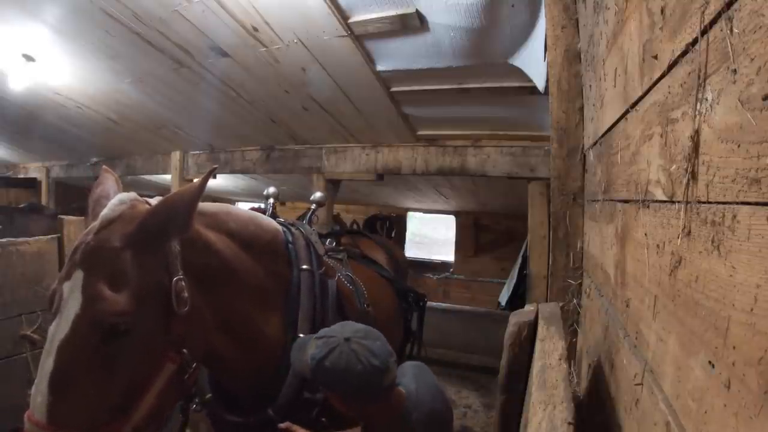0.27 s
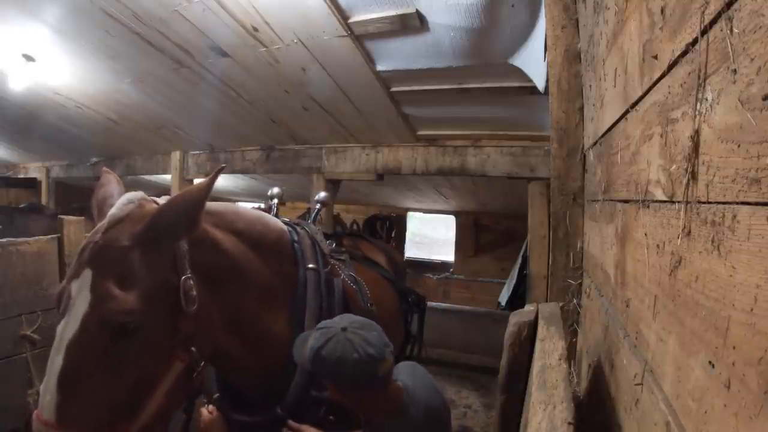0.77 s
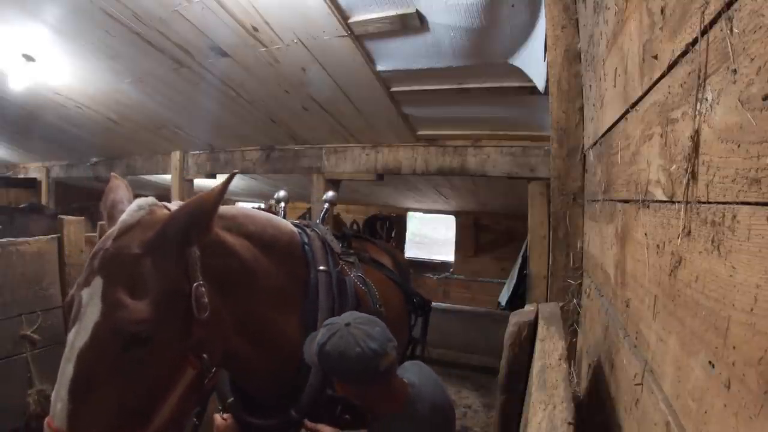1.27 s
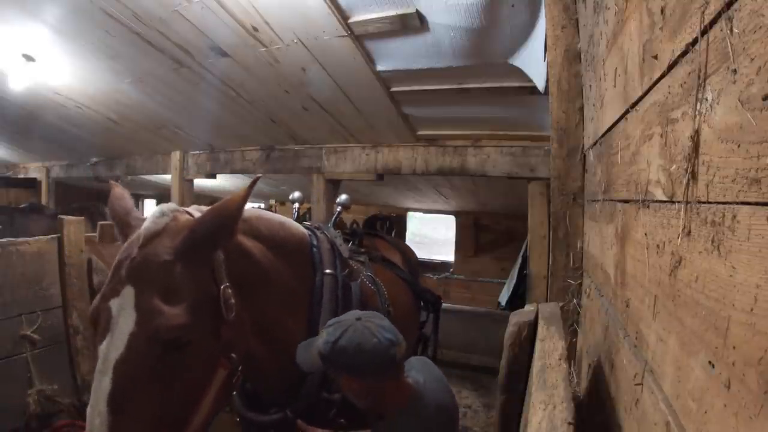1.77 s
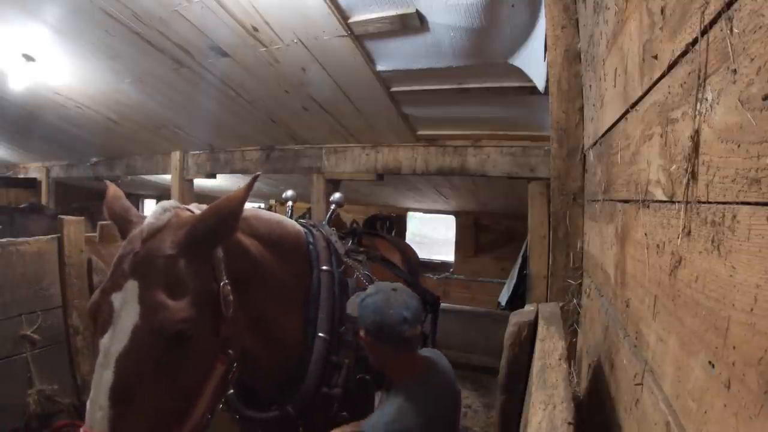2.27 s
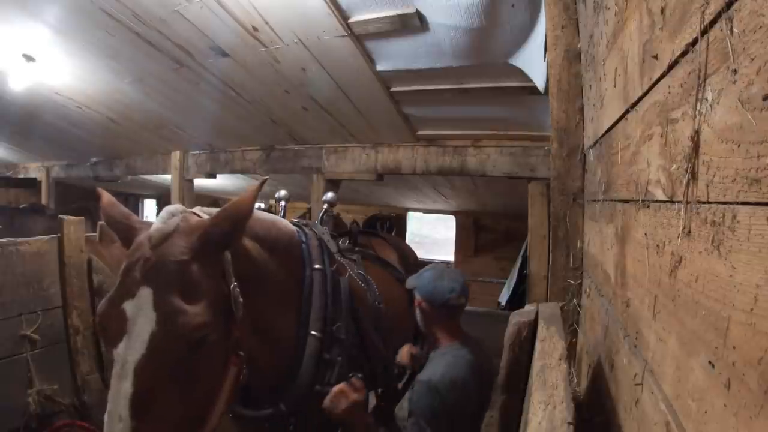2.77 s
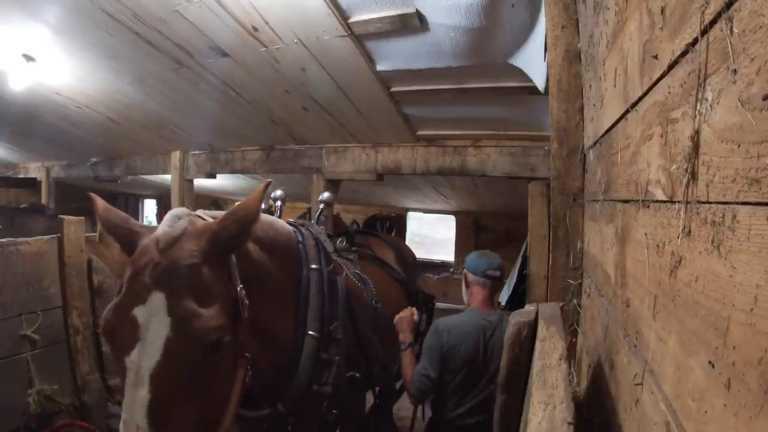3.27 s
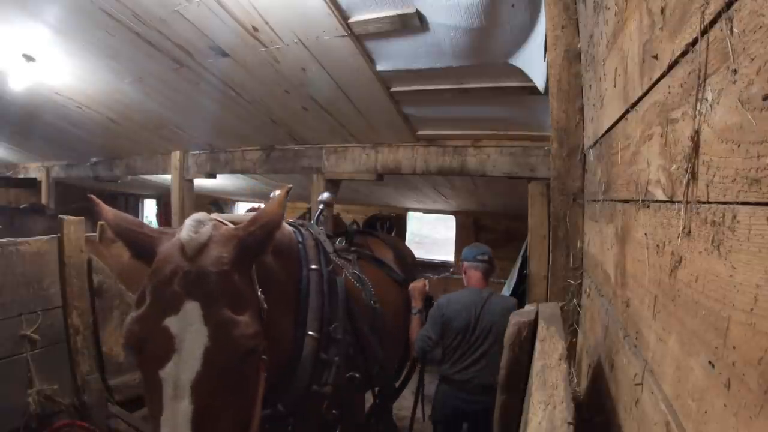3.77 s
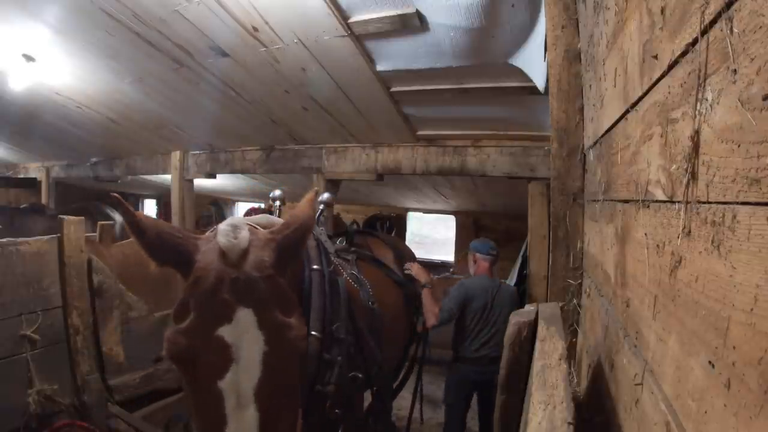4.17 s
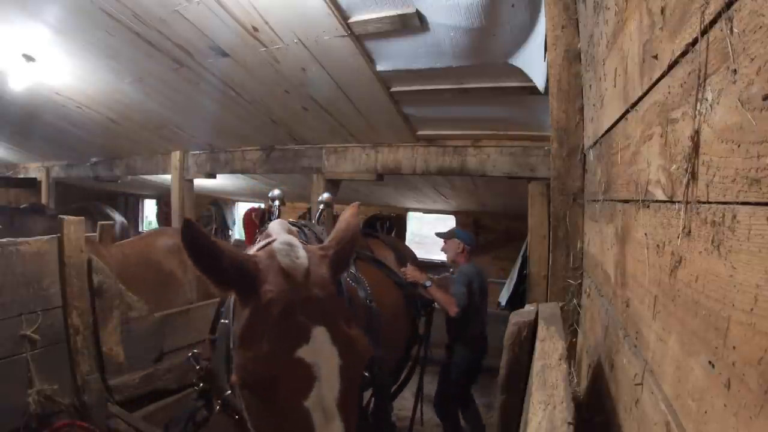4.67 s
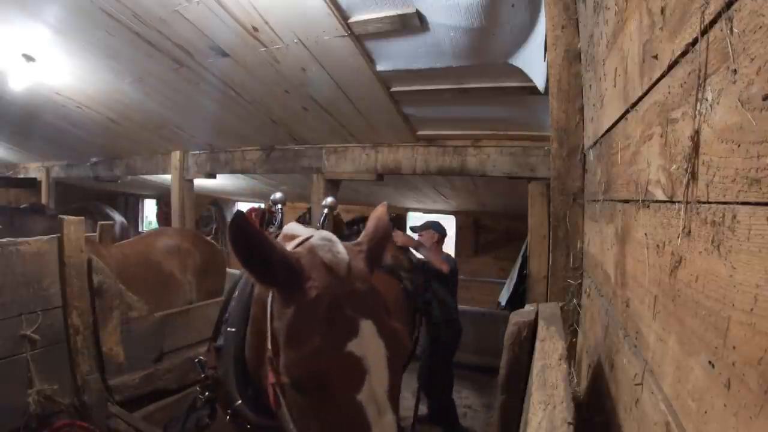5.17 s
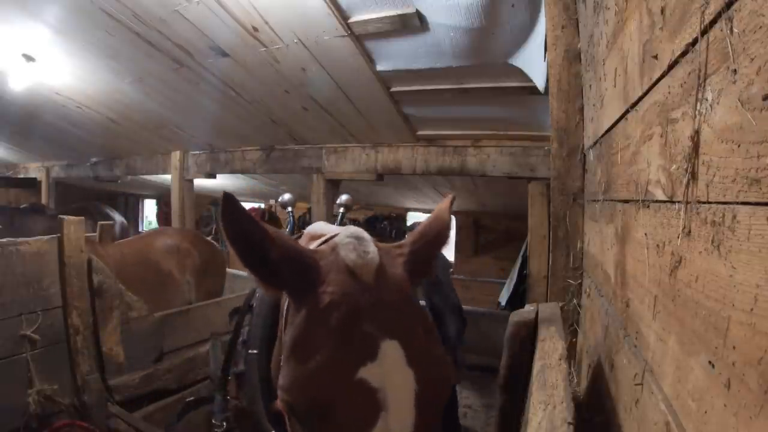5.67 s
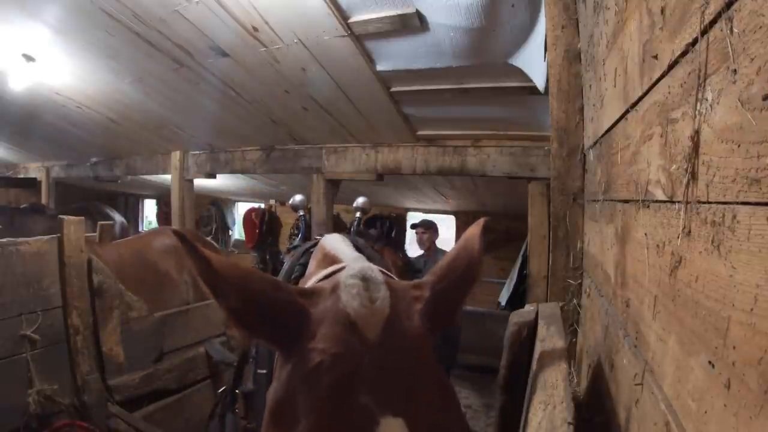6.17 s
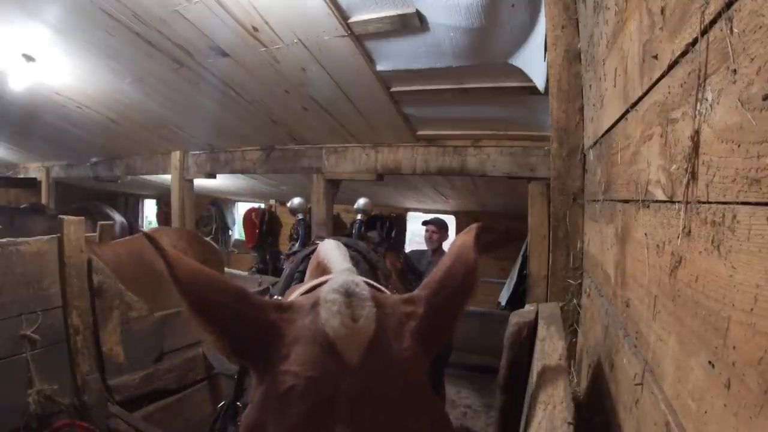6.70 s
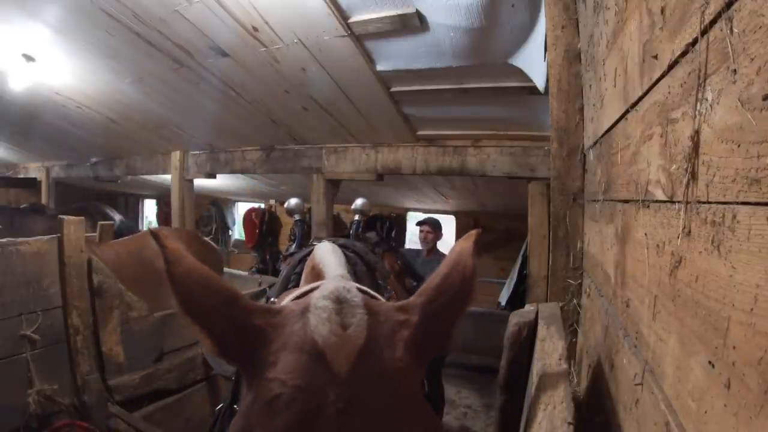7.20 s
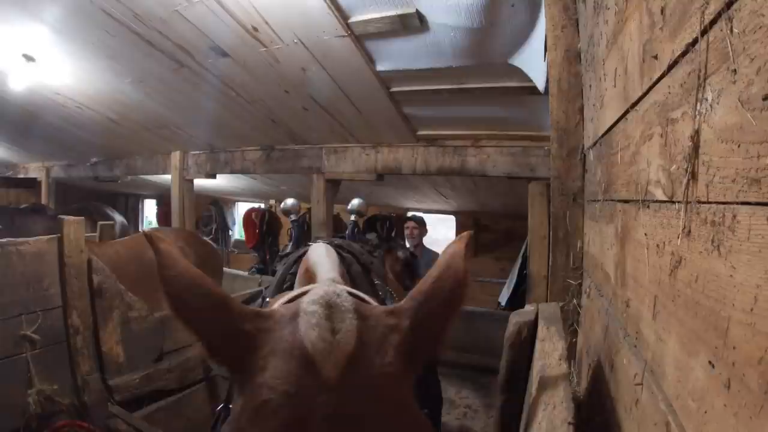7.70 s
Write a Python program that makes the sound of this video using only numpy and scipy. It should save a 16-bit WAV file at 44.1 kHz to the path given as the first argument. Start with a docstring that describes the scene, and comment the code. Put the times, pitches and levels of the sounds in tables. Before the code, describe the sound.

A horse is harnessed in a wooden stall, heard close, with short reflections off the boards. Faint straw and leather rustle and a low barn drone run throughout. A sharp metal snap clicks at about 0.2 seconds, with a lighter one at 0.6. Hollow, heavy thumps of hoof or flank hit the boards around 1.5 and 2.2 seconds, with another sharp snap at 2 and small buckle ticks. From 3 to 4.5 seconds it is quieter, with soft bumps and steps brushing through straw. Knocks build again to a loud wooden thump at about 5.3 seconds and another at 5.7. Chain links, rings and buckles jingle and rattle lightly from there until 6.5 seconds. The rest thins out to faint scrapes and soft bumps, with a few small knocks and a click just before 8 seconds.

```python
"""Harnessing a draft horse in a wooden stall.

Hooves and flanks thump the boards, which ring with the wall and its frame. Snaps and buckles click,
hoof, hame and wood knock, steel rings clink in their own modes. Straw and leather rustle in tiny cracks
over the low drone of the barn. The boards reflect the blows to a small microphone fixed to the wall."""
import sys
import numpy as np
from scipy import signal
from scipy.fft import rfft, irfft
from scipy.io import wavfile
from scipy.ndimage import uniform_filter1d

SR = 44100
rng = np.random.default_rng(int(sys.argv[2]) if len(sys.argv) > 2 else 0)


def generate_wav(signal):
    """Clip the signal to [-1, 1] and save it as 16-bit WAV at the path in sys.argv[1]."""
    frames = np.transpose(np.atleast_2d(signal))
    scaled = np.clip(frames, -1, 1) * 32767
    pcm = np.round(scaled).astype(np.int16)
    wavfile.write(sys.argv[1], SR, pcm)


N = 350154


def undb(db):
    return 10 ** (np.asarray(db) / 20)


def unit(x):
    return x / np.sqrt(np.mean(x ** 2))


def peak(x, db):
    return x * undb(db) / np.max(np.abs(x))


def add(out, start_s, x):
    i = int(start_s * SR)
    out[i:i + len(x)] += x[:N - i]


def colour(x, points):
    """Filter by (Hz, dB) points."""
    hz, db = np.transpose(points)
    bin_hz = np.maximum(np.fft.rfftfreq(len(x), 1 / SR), 1)
    gain = undb(np.interp(np.log(bin_hz), np.log(hz), db))
    return irfft(rfft(x) * gain, len(x))


def band(x, lo_hz, hi_hz):
    sos = signal.butter(2, [lo_hz, min(hi_hz, .45 * SR)], "band", fs=SR, output="sos")
    return signal.sosfilt(sos, x)


def fade(t, t60):
    return np.exp(-np.log(1000) * t / max(t60, .004))


def rise(t, rise_s):
    return 1 - fade(t, rise_s)


def ring(t, modes, spread_db, detune):
    """Damped modes; each blow lands elsewhere and weights them anew."""
    draws = rng.standard_normal((len(modes), 2))
    return sum(undb(db + spread_db * a) * fade(t, t60) * np.sin(2 * np.pi * hz * (1 + detune * b) * t)
               for (hz, db, t60), (a, b) in zip(modes, draws))


def strike(t, modes, tilt_db_per_oct, spread_db):
    """Struck steel; the tilt stands for hardness of touch, which lifts the upper modes."""
    tilted = [(hz, db + tilt_db_per_oct * np.log2(hz / modes[0][0]), t60) for hz, db, t60 in modes]
    return ring(t, tilted, spread_db, detune=.004)


def cracks(events, clank_db, hold_ms):
    """Hard contacts: band noise plus three clank modes. A longer hold also builds more slowly."""
    out, t = np.zeros(N), np.arange(SR // 7) / SR
    hold_s = hold_ms / 1000
    for s, db, hz, t60, octaves in events:
        ratio = 2 ** np.clip(octaves, .2, 2.5)
        noise = band(rng.standard_normal(len(t)), hz / ratio, hz * ratio)
        noise = unit(band(noise, 60, 2 * hz * ratio))
        modes = [(hz, 0, 2.6 * t60), (1.37 * hz, -5, t60), (.89 * hz, -6, t60)]
        clank = undb(clank_db) * ring(t, modes, spread_db=.47, detune=.011)
        envelope = rise(t, 1.6 * hold_s) ** 2 * fade(np.maximum(t - hold_s, 0), t60)
        add(out, s, peak((noise + clank) * envelope, db))
    return out


def flicker(rate_hz, depth_db):
    """Randomly wandering gain."""
    step = int(SR / rate_hz)
    stairs = np.repeat(rng.standard_normal(N // step + 1), step)[:N]
    return undb(depth_db * uniform_filter1d(stairs, step))


def grainy(scatter_db):
    """Noise with scattered stronger grains."""
    return rng.standard_normal(N) * undb(scatter_db * np.minimum(rng.exponential(size=N), 5))


def gain_curves(table):
    times_s, *columns_db = np.transpose(table)
    return [undb(np.interp(np.arange(N) / SR, times_s, db)) for db in columns_db]


def lift(gain, hits, offset_db, t60, rise_s):
    """Add a decaying swell to a gain curve, in power, after each (s, dB) hit."""
    t, power = np.arange(N) / SR, gain ** 2
    for s, db in hits:
        age_s = np.maximum(t - s, 0)
        power += (undb(db + offset_db) * rise(age_s, rise_s) * fade(age_s, t60)) ** 2
    return np.sqrt(power)


def hiss():
    """Faint, even hiss."""
    spectrum = [(3000, -13), (6500, -7.5), (9000, -2.5), (13000, -7), (15500, -20.5)]
    return undb(-87.5) * unit(colour(rng.standard_normal(N), spectrum))


# weight shifts: (time [s], drone [dB], rumble [dB], shuffle [dB])
SHIFT_LEVELS = [(0, -47, -53, -50), (.25, -50.5, -70, -63), (.9, -53.5, -72, -65.5),
                (1.4, -50.5, -65, -55.5), (2, -54, -55, -58.5), (2.8, -51.5, -56, -62),
                (3.4, -55.5, -77, -66), (4.1, -57, -69, -62.5), (4.6, -55, -66, -63.5),
                (4.9, -42, -76, -61), (5.2, -47.5, -62, -55.5), (5.75, -43.5, -45.5, -51.5),
                (6.25, -44.5, -44.5, -49.5), (6.6, -52, -53.5, -64), (7.1, -51, -63.5, -60.5),
                (7.45, -54.5, -75, -66.5), (7.75, -50.5, -73, -71), (7.94, -40, -67, -55)]
# stall resonances, shuffling feet: (frequency [Hz], level [dB])
DRONE_SPECTRUM = [(53, -50.5), (90, -38), (139, 1), (161, 4.5), (194, 1), (225, 1.5), (243, 3), (258, 1),
                  (286, -2), (334, -10.5), (400, -10), (520, -37), (880, -120)]
SHUFFLE_SPECTRUM = [(250, -15), (340, 11.5), (550, 6.5), (1000, -26), (1400, -50)]


def shifting():
    """The stall hums in its low resonances, the frame rumbles, feet shuffle; all swell after thumps."""
    drone, rumble, shuffle = gain_curves(SHIFT_LEVELS)
    heavy = [(s, db) for s, db, *_ in THUMPS if db > -26]
    booms = [(s, db + boom_db) for s, db, _, _, boom_db, _ in THUMPS]
    drone = lift(drone, heavy, offset_db=-32.5, t60=.89, rise_s=.1)
    rumble = lift(rumble, booms, offset_db=-8.5, t60=.87, rise_s=.091)
    shuffle = lift(shuffle, heavy, offset_db=-27, t60=.41, rise_s=.08)
    noise = rng.standard_normal((3, N))
    return (drone * flicker(12, 3.85) * unit(colour(noise[0], DRONE_SPECTRUM))
            + rumble * flicker(6, 1.8) * unit(band(band(noise[1], 15, 93.4), 5.1, 80))
            + shuffle * flicker(15, 6.2) * unit(colour(noise[2], SHUFFLE_SPECTRUM)))


# straw and leather: (time [s], body [dB], crisp top [dB])
RUSTLE_LEVELS = [(0, -53, -57.5), (.5, -64.5, -56), (1.35, -58.5, -61.5), (1.55, -64, -70),
                 (1.95, -62, -61.5), (2.6, -62.5, -60.5), (3.1, -61.5, -58), (4, -65, -56.5),
                 (4.5, -61.5, -60.5), (4.85, -56.5, -55), (5.3, -57, -64), (5.57, -72, -58),
                 (5.7, -55, -77), (6, -51.5, -66), (6.2, -49.5, -83), (6.6, -65, -95), (7.1, -59.5, -77.5),
                 (7.6, -67.5, -68), (7.67, -63.5, -58), (7.94, -54.5, -48)]
# their two layers: (frequency [Hz], level [dB])
BODY_SPECTRUM = [(500, -20), (750, -9.5), (1070, -12), (1700, -8.5), (2300, -14.5), (4200, -13.5),
                 (5700, -21), (7000, -38.5), (10000, -55)]
CRISP_SPECTRUM = [(2650, -10), (4500, -7), (6770, -6), (8820, -10), (10400, -20), (11400, -35.5),
                  (13500, -29.5), (15500, -45.5)]


def rustle():
    """Dense tiny cracks of dry straw and leather; straps settle after loud knocks and ticks."""
    body, crisp = gain_curves(RUSTLE_LEVELS)
    loud_knocks = [(s, db) for s, db, *_ in KNOCKS if db > -30]
    loud_ticks = [(s, db) for s, db, *_ in TICKS if db > -14]
    body = lift(body, loud_knocks, offset_db=-33, t60=.87, rise_s=.03)
    crisp = lift(crisp, loud_ticks, offset_db=-45, t60=1.24, rise_s=.03)
    return (body * flicker(25, 2.9) * unit(colour(grainy(3.52), BODY_SPECTRUM))
            + crisp * flicker(41, 2.1) * unit(colour(grainy(2.94), CRISP_SPECTRUM)))


# steps in straw: (time [s], level [dB], half length [s])
SWISHES = [(0.075, -46.5, 0.029), (0.82, -54.5, 0.031), (1.271, -53.5, 0.047), (3.032, -55, 0.053),
           (3.575, -51.5, 0.089), (3.867, -50, 0.062), (4.015, -55.5, 0.012), (4.201, -51.5, 0.051),
           (4.444, -57.5, 0.061), (4.66, -53, 0.046), (5.194, -49.5, 0.065), (5.312, -46.5, 0.061)]


def swishes():
    """Steps brush through straw in soft, broadband swells."""
    t = np.arange(N) / SR
    envelope = sum(undb(db) * np.exp(-((t - s) / half_s) ** 2) for s, db, half_s in SWISHES)
    spectrum = [(900, -17), (2000, -3.5), (4000, -3), (7000, -3), (9000, -4.5), (11000, -20),
                (15000, -36.5)]
    return envelope * unit(colour(grainy(2.1), spectrum))


# steel pieces: (frequency [Hz], level [dB], t60 [s])
BIG_RING_MODES = [(4045, 0, .2), (5539, -12, .25), (5865, -16, .12), (7296, -5, .1), (7470, -5, .25),
                  (8185, -8, .12), (9604, -11, .09), (10580, -16, .1), (11480, -20, .08), (13160, -20, .15)]
HOOK_MODES = [(5313, 0, .3), (7106, -14, .1), (9351, -5, .14), (13300, -16, .1), (14700, -14, .12)]
LOOP_MODES = [(3800, -1, 0.15), (5313, -16, .19), (7400, -11, 0.2), (8005, -8, 0.093), (9400, -20, .2),
              (10230, -13, 0.16), (12900, -22, .2), (14300, -22, .2)]
LINK_MODES = [(5730, 0, .14), (8670, -3, .08), (10100, -9, .07), (12400, -5, .08), (12720, -4, .08),
              (14460, -5, .07)]
BUCKLE_MODES = [(2514, -6.5, .12), (4510, -2, .11), (6260, -14, .08), (9300, -13, 0.088)]
SNAP_MODES = [(2850, -2, .14), (5400, -2, .06), (6200, -5, .06), (7000, -2, .045), (9400, -3, .04),
              (10600, -6, .09)]
# blows on the big ring: (time [s], level [dB], tilt [dB/octave])
BIG_RING_HITS = [(1.0934, -49, -11), (1.4628, -49, 0), (2.2907, -55, -12), (2.7298, -38, 4),
                 (5.2505, -50, -8), (5.449, -44, -12), (6.1294, -55, -1), (6.458, -39, -17)]
# blows on the other pieces: (time [s], level [dB])
HOOK_HITS = [(1.7574, -43), (5.8232, -56)]
LOOP_HITS = [(5.574, -40), (5.8324, -51)]
LINK_HITS = [(5.3014, -40), (5.7783, -49), (5.8147, -55), (5.9828, -51), (6.2267, -53), (6.2444, -50),
             (6.2694, -56), (6.345, -48.5), (7.0409, -60), (7.2863, -63), (7.7315, -53), (7.8644, -46)]
BUCKLE_HITS = [(5.9787, -34), (6.0466, -36), (6.099, -39), (6.166, -39), (6.2083, -37)]
SNAP_HITS = [(.1685, -27), (.204, -30), (.5682, -46), (2.0587, -36)]


def clinks():
    """Steel pieces ring clean; the big ring is struck in different places."""
    out, t = np.zeros(N), np.arange(SR // 4) / SR
    pieces = [(HOOK_MODES, HOOK_HITS, -1.5), (LOOP_MODES, LOOP_HITS, -1.4), (LINK_MODES, LINK_HITS, 1.5),
              (BUCKLE_MODES, BUCKLE_HITS, -1.8), (SNAP_MODES, SNAP_HITS, 1.2)]
    blows = [(BIG_RING_MODES, *hit) for hit in BIG_RING_HITS]
    for modes, hits, tilt_db_per_oct in pieces:
        blows += [(modes, s, db, tilt_db_per_oct) for s, db in hits]
    for modes, s, db, tilt_db_per_oct in blows:
        add(out, s, undb(db) * strike(t, modes, tilt_db_per_oct, spread_db=2.5) * rise(t, .012))
    return out


def jingle(start_s=5.4, end_s=6.55, touches=45):
    """Chain links of several sizes touch at random, damped by leather, each with a bright scratch."""
    out, t = np.zeros(N), np.arange(SR // 10) / SR
    for when, pitch, force in rng.random((touches, 3)):
        link = strike(t * (.85 + .3 * pitch), LINK_MODES, tilt_db_per_oct=4, spread_db=6)
        link = link * fade(t, .2) * rise(t, .004)
        scratch = band(rng.standard_normal(len(t)), 11140, 13000) * fade(t, .062)
        add(out, start_s + when * (end_s - start_s), undb(-72.5 + 18.7 * force) * (link + 7.7 * scratch))
    return out


def rattle(start_s=5.86, end_s=6.42, count=70):
    """Straps and buckles rattle as the horse turns: small random cracks, a few strong."""
    events = [(start_s + when * (end_s - start_s), -48 + 10 * force ** 2, 900 * 2 ** (2.5 * pitch), .03, .6)
              for when, force, pitch in rng.random((count, 3))]
    return cracks(events, clank_db=1.4, hold_ms=2.5)


# scrapes: (time [s], level [dB], centre [Hz], t60 [s], half width [octaves])
SCRAPES = [(.199, -18.5, 2890, 0.038, 0.3), (.203, -18, 5350, 0.024, 0.36), (6.8, -51.5, 762, 0.16, 0.25),
           (6.93, -55, 1676, 0.21, .3), (7.385, -52, 557, .06, .35), (7.2, -48, 563, 0.087, 0.49),
           (7.325, -46, 613, 0.11, 0.22)]


def scrapes():
    """Metal and wood scrape in short, drawn-out contacts."""
    return cracks(SCRAPES, clank_db=2.9, hold_ms=19.8)


# harness ticks: (time [s], level [dB], centre [Hz], t60 [s], half width [octaves])
TICKS = [(.137, -28, 2480, 0.051, 1.2), (.168, -1.5, 7000, 0.022, 0.66), (0.4123, -31, 2770, 0.035, 0.73),
         (0.5643, -9.5, 6326, 0.028, 0.45), (.7513, -37, 2860, 0.09, 1.2),
         (1.1604, -37.5, 5400, .036, 0.47), (1.2577, -33.5, 2830, 0.035, 0.74),
         (1.3815, -35, 3940, 0.088, .93), (1.4338, -36.5, 5490, 0.11, 0.48),
         (1.4633, -40.5, 3920, .045, 1.2), (1.5809, -41, 7200, 0.027, 1.6),
         (1.69, -40.5, 4870, 0.031, 0.49), (1.7268, -32, 2830, 0.036, 1.1),
         (1.7524, -32.5, 5340, 0.026, 0.76), (1.9233, -37, 3070, 0.062, 0.75),
         (2.0113, -38, 3400, .045, 0.31), (2.0588, 0, 6326, 0.015, 0.66), (2.1648, -15.5, 3820, 0.019, 0.7),
         (2.196, -21.5, 3155, 0.068, 1.3), (2.2337, -15, 2720, 0.009, 0.8),
         (2.3726, -25.5, 3680, 0.023, 0.53), (2.4192, -30.5, 3440, .037, .94),
         (2.4545, -48, 3300, .024, 0.78), (2.4708, -21, 3475, 0.009, 0.61), (2.7298, -39, 4100, .066, 2),
         (2.8946, -34, 3100, 0.061, 1.6), (2.9852, -41, 3880, 0.059, 0.86), (3.2589, -32, 2380, .034, 1.7),
         (4.6415, -38, 5910, .045, 1.2), (4.8442, -23, 3380, .045, 1.03), (5.062, -42, 3400, 0.033, 1.2),
         (5.0884, -24, 3880, 0.046, 0.93), (5.097, -20.5, 3800, .03, 0.74), (5.283, -28, 9900, 0.05, 1.3),
         (5.352, -32, 2240, 0.063, 1.7), (5.4487, -28, 4020, .079, 1.1), (5.469, -22, 3860, .04, 0.82),
         (5.518, -15.5, 3396, 0.042, 1.2), (5.7335, -34.5, 2730, 0.029, 3.3),
         (5.8755, -27.5, 2630, 0.028, 1.3), (5.9136, -37, 3370, 0.038, .47),
         (5.9796, -26.5, 4380, 0.17, 0.38), (6.0934, -27, 2560, 0.075, 0.85),
         (6.154, -28.5, 4400, .041, 0.65), (6.2064, -26, 4080, 0.04, 0.33),
         (6.3097, -45, 2770, 0.036, 0.45), (6.427, -50, 2800, .049, 0.68), (6.5476, -50, 9000, 0.028, 1.2),
         (7.909, -25.5, 3470, 0.017, 1.9)]


def ticks():
    """Snaps, buckles and straps click on brief contact."""
    return cracks(TICKS, clank_db=2.8, hold_ms=2.58)


# hard knocks: (time [s], level [dB], centre [Hz], t60 [s], half width [octaves])
KNOCKS = [(.057, -39, 770, 0.13, .99), (0.567, -33, 1350, .039, .99), (0.902, -39.5, 1670, 0.03, .99),
          (1.16, -44, 1410, 0.031, 0.45), (1.246, -38.5, 650, .044, .99), (1.436, -35, 2220, 0.082, 1),
          (1.505, -26.5, 564, 0.081, 0.81), (1.759, -38.5, 570, 0.039, .99), (1.924, -45, 810, 0.11, .99),
          (2.059, -31, 1520, 0.021, 0.9), (2.162, -16, 1644, 0.057, 0.63), (2.233, -21.5, 885, 0.046, 0.88),
          (2.499, -32.5, 1685, 0.051, 0.68), (2.899, -45, 900, 0.04, 0.71), (3.26, -36, 558, 0.03, .99),
          (4.244, -45, 730, 0.036, .99), (4.656, -33.5, 688, 0.072, .99), (4.765, -32.5, 635, .054, .99),
          (4.844, -29.5, 1320, 0.078, 0.94), (5.061, -36, 707, 0.071, 0.86),
          (5.283, -34.5, 1710, 0.1, 0.87), (5.346, -12.5, 746, .092, 1), (5.352, -19, 1820, 0.024, 0.29),
          (5.388, -25, 1293, 0.28, 0.31), (5.518, -43, 1340, .07, .9), (5.736, -16, 1643, 0.041, 0.56),
          (5.98, -25.5, 590, 0.11, .99), (6.072, -32, 2030, 0.06, 0.46), (6.157, -31.5, 1165, .063, 0.97),
          (6.206, -35.5, 695, 0.085, 0.5), (6.285, -34, 1716, 0.14, .65), (6.308, -35, 620, .088, 0.82),
          (6.493, -35.5, 860, 0.059, .99), (7.849, -39.5, 810, 0.18, 0.18), (7.865, -35, 764, 0.073, 1),
          (7.909, -33, 825, 0.029, .99)]


def knocks(heavy_db=-21):
    """Hoof, hame and wood knock; heavy blows stay in contact longer."""
    light = [row for row in KNOCKS if row[1] < heavy_db]
    heavy = [row for row in KNOCKS if row[1] >= heavy_db]
    return cracks(light, clank_db=1.5, hold_ms=4.5) + cracks(heavy, clank_db=.93, hold_ms=8.1)


# board wall, upper boards, frame: (frequency [Hz], level [dB], t60 [s])
WALL_MODES = [(125, -11, 0.28), (169.5, -2.5, 0.37), (194.8, -4, 0.28), (251.8, 3, 0.24),
              (326.1, -1.5, 0.18), (410.6, -2, 0.14)]
UPPER_MODES = [(485, 1, 0.13), (569.6, 0.5, 0.096), (689, -7, 0.089), (774.4, -12, 0.15), (890, -12, 0.045)]
FRAME_MODES = [(31.7, 4.5, 0.26), (43.44, 4.5, 0.35), (55.5, -6.5, 0.36), (72.6, -2, 0.17), (91.2, 1, 0.32)]
# thumps: (time [s], level [dB], board [Hz], upper boards [relative dB], boom [relative dB], t60 [s])
THUMPS = [(0.018, -36.5, 193, -14, -22, 0.15), (.075, -26.5, 170, -31, -25, .079),
          (.265, -33.5, 240, -30, -34, 0.11), (.35, -45, 247, -16, -31, 0.31),
          (.755, -48.5, 201, -10, -1, .12), (.822, -41.5, 243, -10, -28, 0.077),
          (.897, -45, 196, -17, -29, 0.17), (0.964, -38.5, 247, -24, -44, 0.072),
          (1.009, -29, 241, -29, -41, 0.073), (1.254, -18.5, 256, -26, -18, 0.2),
          (1.399, -34, 240, -15, -27, .18), (1.502, -4, 201, -12.5, -11, 0.14),
          (1.597, -17, 251.6, -14, -5, 0.1), (1.757, -23.5, 138.3, -11, -17, 0.16),
          (1.934, -25.5, 163.6, -26, -25, 0.13), (2.04, -20.5, 153, -27, -5.5, 0.049),
          (2.168, -14, 254, -10.5, -7, 0.12), (2.179, -5, 253.6, -14, -17, .16),
          (2.244, -14.5, 249.7, -24, -17, 0.22), (2.255, -31.5, 129, -32, 13, 0.15),
          (2.32, -31, 130, -28, 8, 0.11), (2.506, -21, 249.3, -14, -12, .15),
          (2.781, -33, 266.5, -30, -22, 0.21), (3.078, -35.5, 242, -25, -36, 0.12),
          (3.121, -34, 252, -9, -37, .18), (3.266, -33.5, 263, -15, -43, 0.089),
          (3.632, -41, 260, -17, -31, .2), (3.826, -31, 265, -15.5, -42, 0.2),
          (3.996, -40.5, 131, -22, -19, 0.3), (4.235, -32.5, 248, -15, -12.5, 0.33),
          (4.332, -36.5, 161, -11, -29, 0.11), (4.415, -29, 262, -22, -31, 0.16),
          (4.651, -24, 272, -9, -48, 0.25), (4.762, -25.5, 275, -27, -26, 0.11),
          (4.847, -19.5, 273.6, -20, -21, 0.34), (4.87, -26, 165, -36, -33, 0.55),
          (5.063, -24.5, 364, -13.5, -34, 0.18), (5.133, -28.5, 167, -16, -1.5, .18),
          (5.294, -17.5, 141, -26, 3.5, 0.1), (5.338, -2.5, 128.6, -15.5, -21, 0.25),
          (5.42, -15, 127.5, -11, -8, .23), (5.541, -27, 105, -32, -12, 0.11),
          (5.741, -14, 330, -5, -24, 0.18), (5.912, -44, 356, -9, 3, .18),
          (5.958, -34.5, 200, -8, -32, .21), (6.02, -33, 220, -23, -18, 0.15),
          (6.142, -36.5, 166, -10.5, 1, .17), (6.311, -33, 193, -10, -10, .17),
          (6.743, -43.5, 185, -5.5, -15, 0.16), (6.77, -42, 166, -24.5, -11, 0.081),
          (6.867, -39.5, 198, -13.5, -17, .15), (6.926, -35.5, 177, -16, -6, 0.23),
          (7.03, -36, 169.6, -14.5, -15, .15), (7.21, -42, 196, -10.5, -18, 0.17),
          (7.432, -39.5, 198, -21, -30, .16), (7.626, -46, 182, -18, -33, .18),
          (7.78, -35.5, 180, -17, -16, 0.09), (7.879, -35.5, 193, -16, -22, 0.12)]


def thumps(rise_s=.02994, wall_t60=.37):
    """A soft, heavy push of hoof or flank swells in the struck board and wall; the frame booms late."""
    out, t = np.zeros(N), np.arange(SR // 2) / SR
    swell = rise(t, rise_s) ** 2
    for s, db, board_hz, upper_db, boom_db, t60 in THUMPS:
        wall = [(hz, mode_db, mode_t60 * t60 / wall_t60) for hz, mode_db, mode_t60 in WALL_MODES]
        board = ring(t, [(board_hz, 4, t60)] + wall, spread_db=2.9, detune=.02) * swell
        upper = ring(t, UPPER_MODES, spread_db=1.95, detune=.033) * swell
        boom = ring(t, FRAME_MODES, spread_db=5.1, detune=.04) * rise(t, .061) ** 2
        add(out, s - rise_s / 6, peak(board, db) + peak(upper, db + upper_db) + peak(boom, db + boom_db))
    return out


def stall(x, wet_db, low_t60, high_t60):
    """Dense reflections off the boards; the treble dies first."""
    t = np.arange(SR // 2) / SR
    noise = rng.standard_normal((2, len(t)))
    low = 1.22 * band(noise[0], 28, 1000) * fade(t, low_t60)
    high = band(noise[1], 1100, 16000) * fade(t, high_t60)
    tail = (low + high) * rise(t, .0077)
    return x + undb(wet_db) * signal.fftconvolve(x, tail / np.sqrt(np.sum(tail ** 2)))[:N]


# microphone response to harness and knocks: (frequency [Hz], gain [dB])
MIC_RESPONSE = [(20, 10), (8500, -4.5), (10500, -9), (12000, -19.5), (16000, -8)]


def scene():
    """Mono mix of thumps, harness sounds and background."""
    contacts = ticks() + scrapes() + rattle() + jingle() + knocks()
    near = stall(contacts, wet_db=-7, low_t60=.33, high_t60=.17)
    near += stall(clinks(), wet_db=-10.5, low_t60=.2, high_t60=.1264)
    background = rustle() + swishes() + shifting() + hiss()
    boards = stall(thumps(), wet_db=-10, low_t60=.42, high_t60=.25)
    return (boards + colour(near, MIC_RESPONSE) + background)[None]


def record(dry, cutoff_hz=15400):
    """A steep low-pass cuts the top."""
    return signal.sosfilt(signal.ellip(8, .2, 70, cutoff_hz, fs=SR, output="sos"), dry)


dry = scene()
out = record(dry)
generate_wav(out)
```